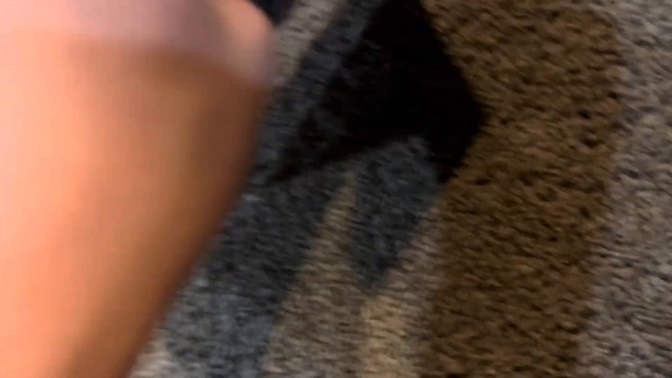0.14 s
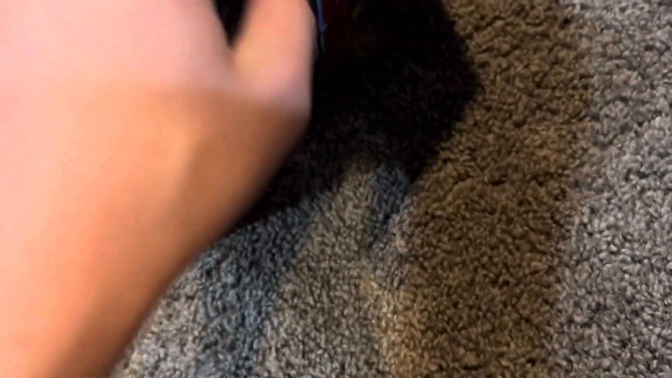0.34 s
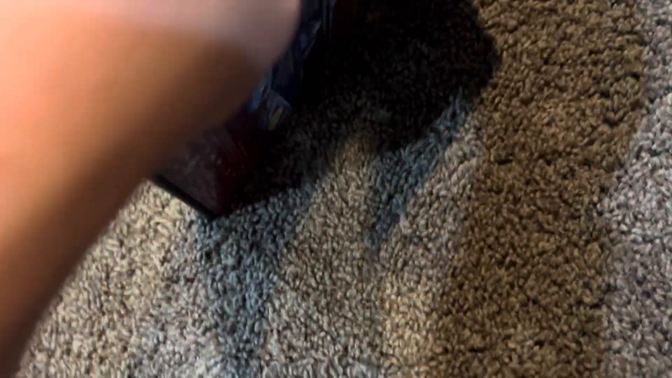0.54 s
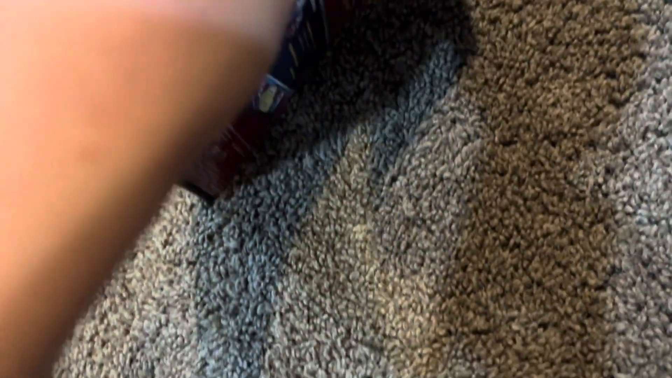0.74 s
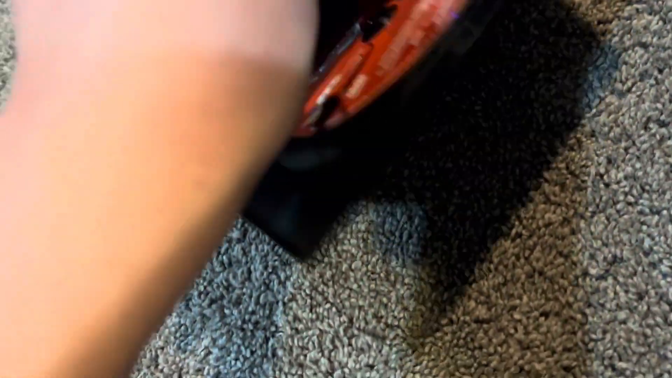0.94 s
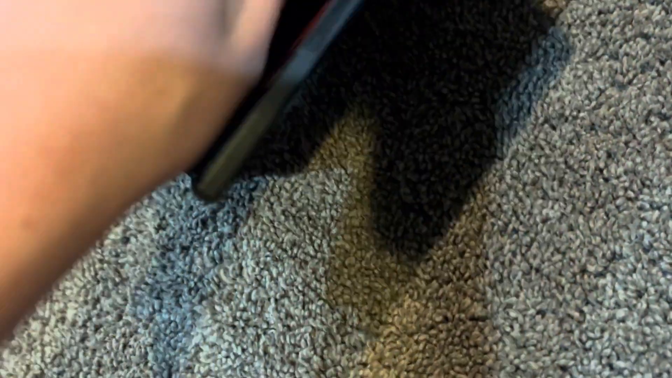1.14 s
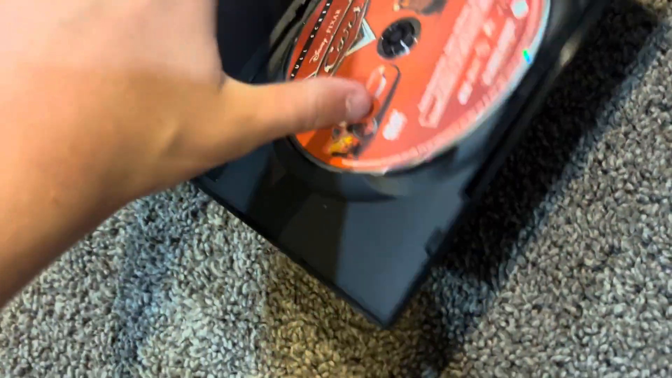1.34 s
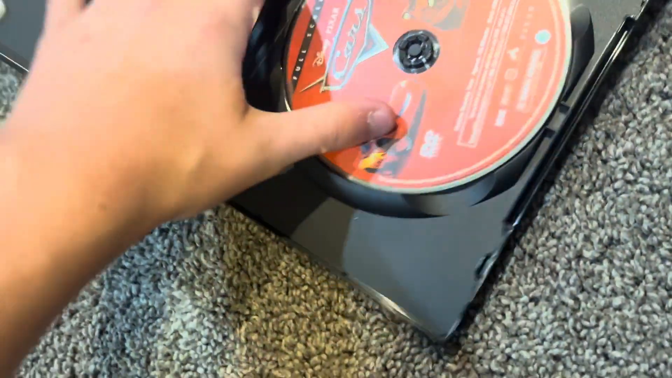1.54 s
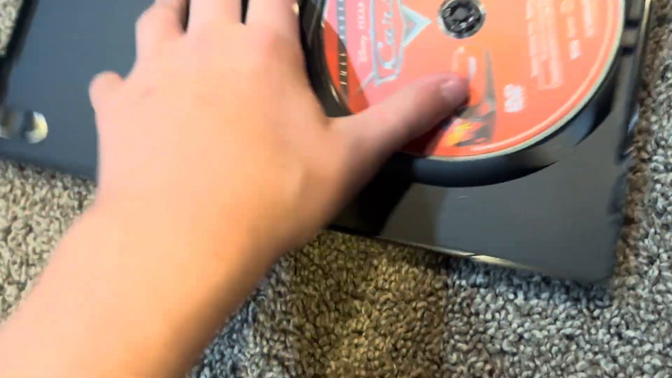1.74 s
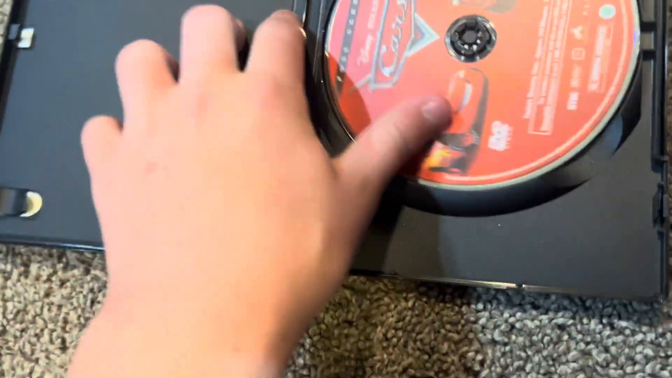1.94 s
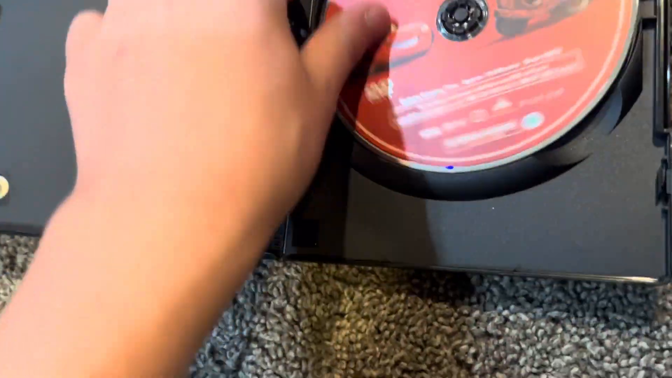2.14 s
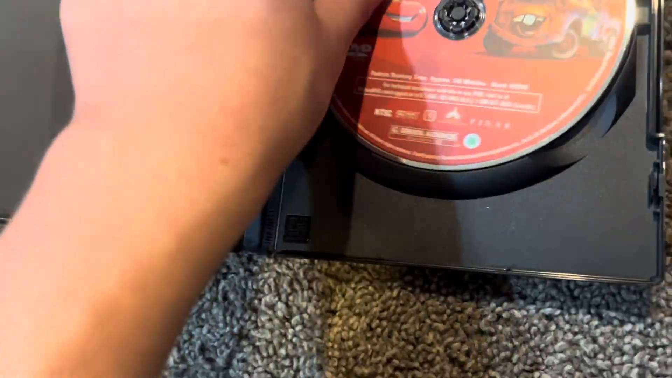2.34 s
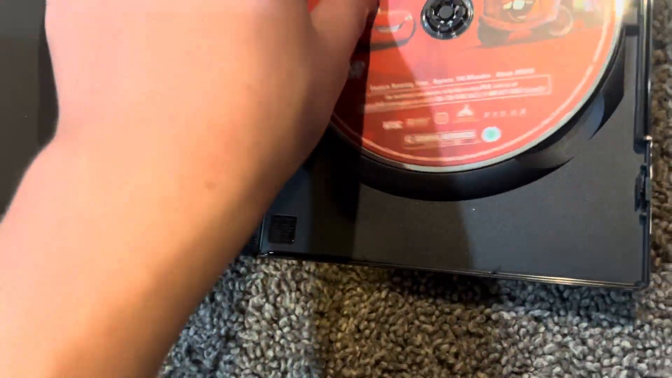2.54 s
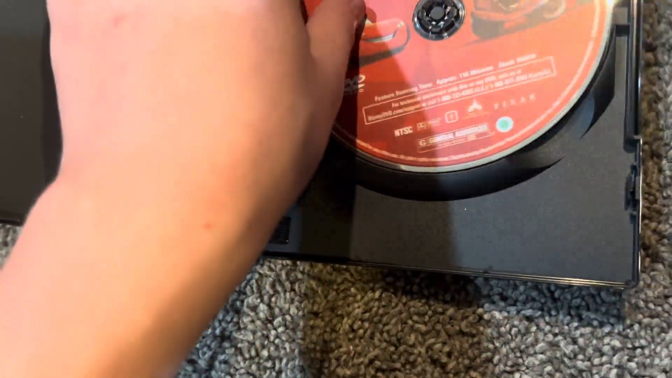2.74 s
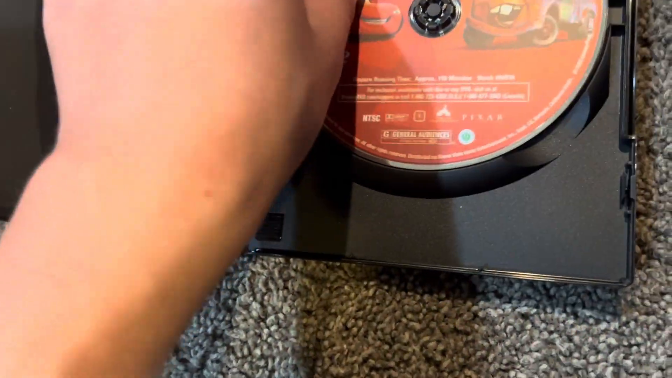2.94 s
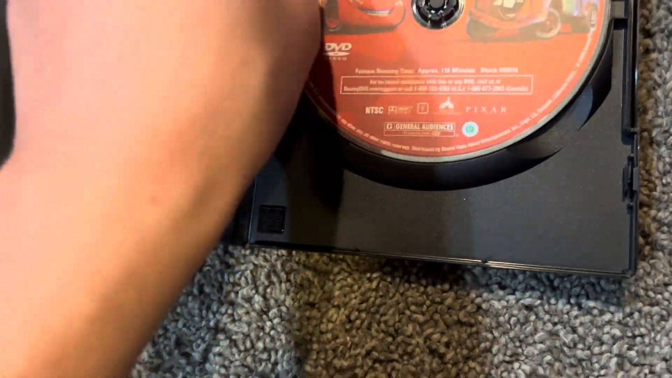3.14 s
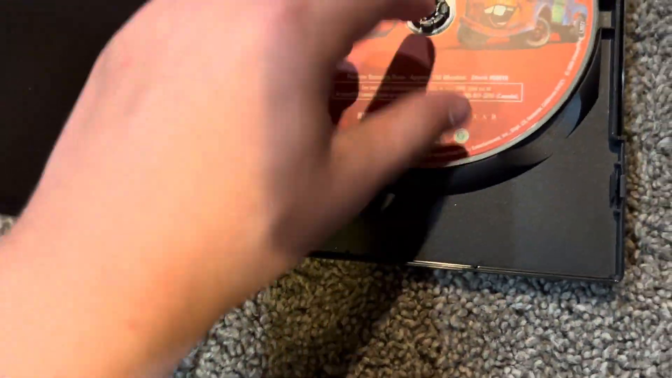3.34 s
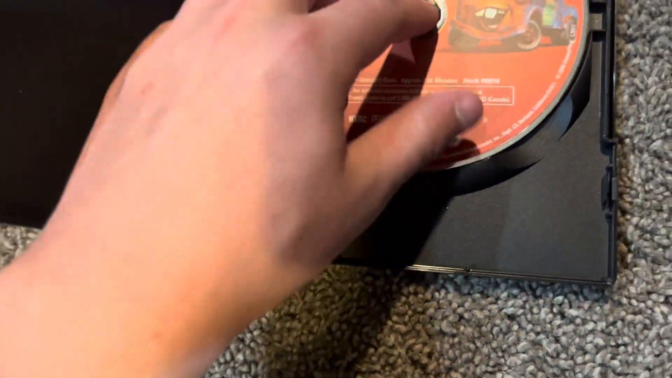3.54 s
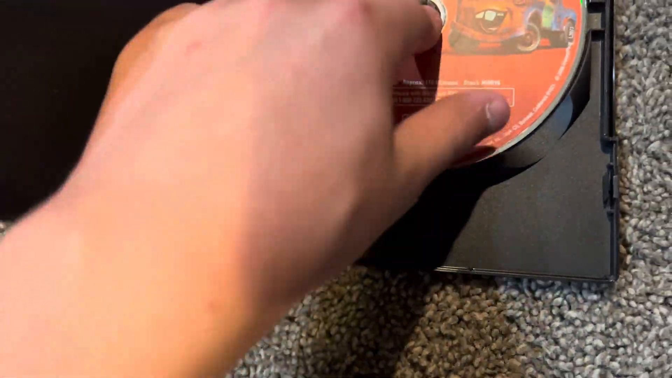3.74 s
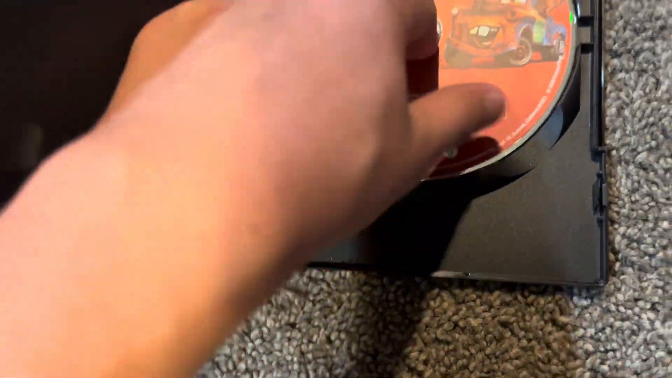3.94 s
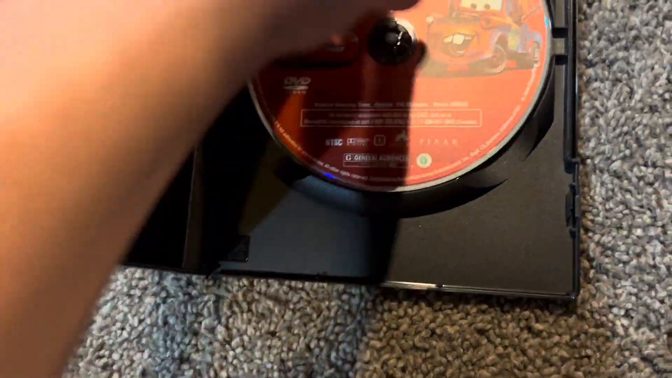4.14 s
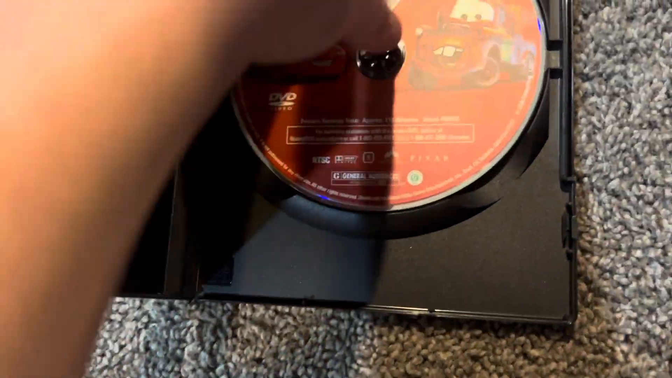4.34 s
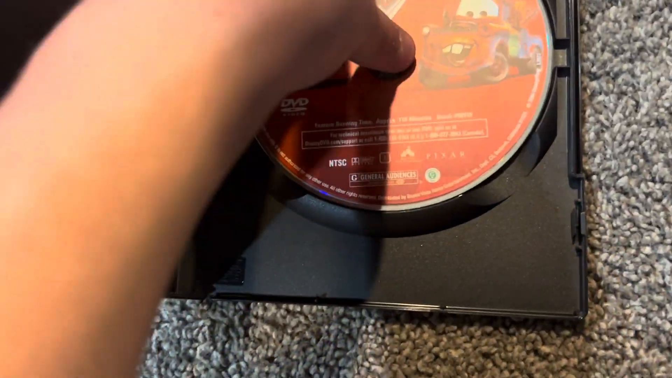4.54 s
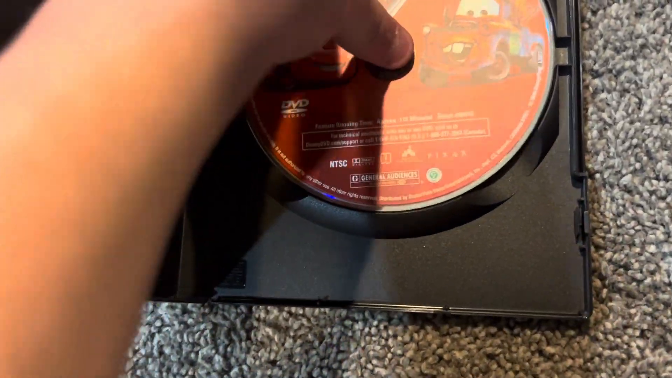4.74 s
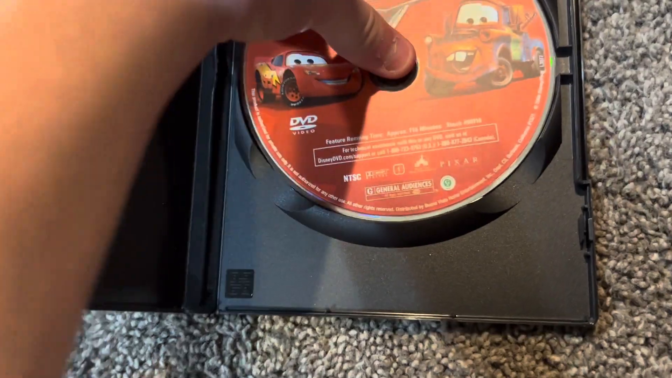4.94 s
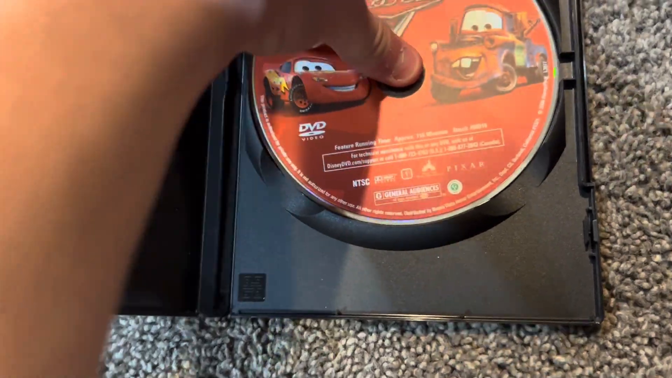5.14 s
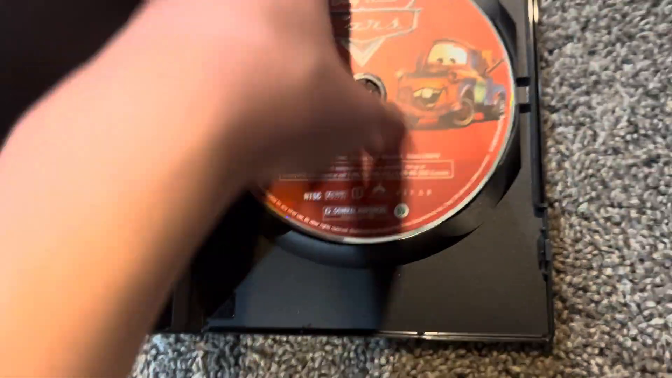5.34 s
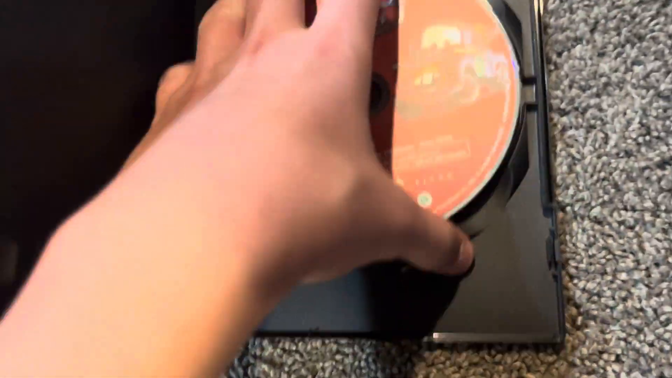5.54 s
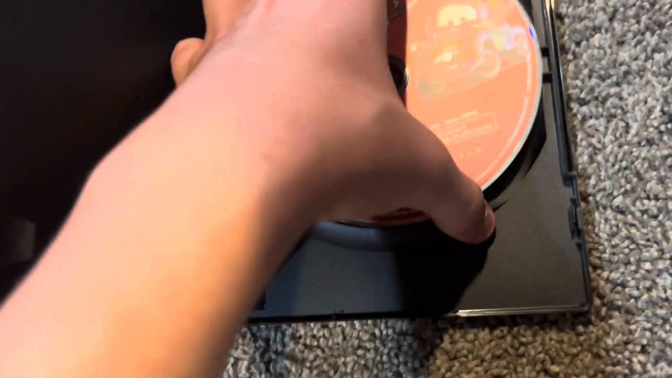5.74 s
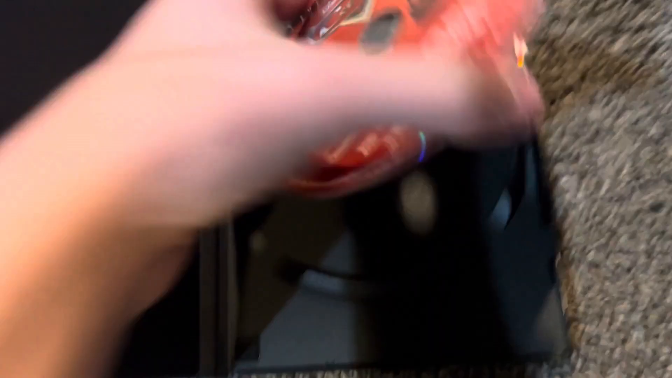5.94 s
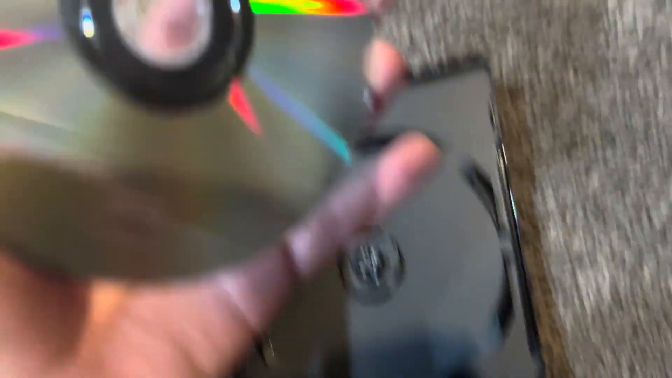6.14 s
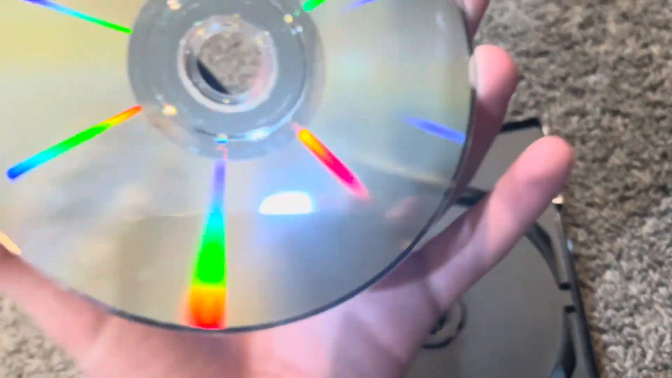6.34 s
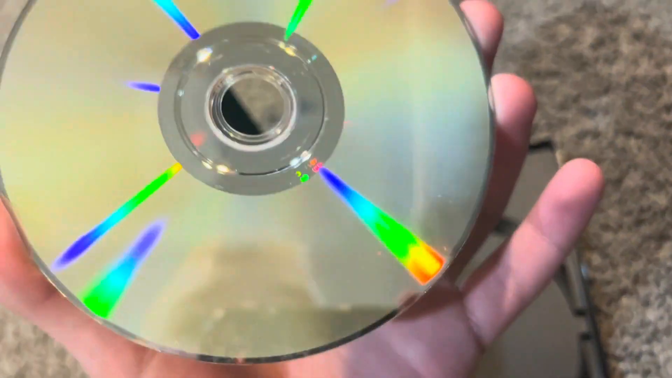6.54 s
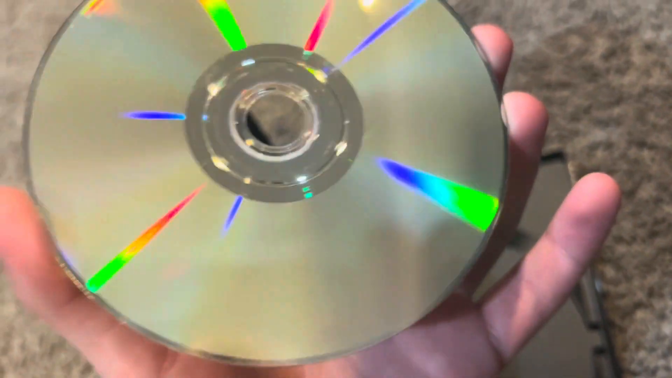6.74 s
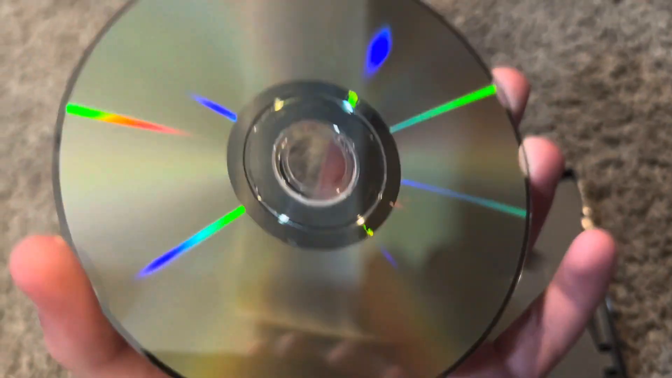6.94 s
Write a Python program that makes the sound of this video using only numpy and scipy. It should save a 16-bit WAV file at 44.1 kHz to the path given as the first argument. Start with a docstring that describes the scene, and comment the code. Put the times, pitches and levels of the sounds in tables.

```python
"""Plastic disc case handled on a carpet

Two latches snap open as ringing modes with a crack and a thump; the spine crackles in filtered noise bursts.
Fingers slide over case and disc as coloured noise, with squeaks and groans from noise-fed resonances.
The hub lets go with two snaps, and the loose disc rattles and knocks against the tray.
All is close to the microphone, with a short room tail, over a low hum with wavering tones and faint hiss."""
import sys
import numpy as np
from scipy import signal
from scipy.fft import rfft, irfft, next_fast_len
from scipy.io import wavfile

SR = 44100
rng = np.random.default_rng(int(sys.argv[2]) if len(sys.argv) > 2 else 0)


def log_audio(samples):
    """Write samples as a 16-bit WAV file to the path given in sys.argv[1]."""
    # one column per channel
    frames = np.atleast_2d(samples).T
    # limit to full scale, then quantise
    limited = np.clip(frames, -1, 1)
    pcm = np.round(limited * 32767).astype(np.int16)
    wavfile.write(sys.argv[1], SR, pcm)


N = 308259
TIME_S = np.arange(N) / SR
HIT_TIME_S = np.arange(6000) / SR


def gain_of(db):
    """Decibels to amplitude."""
    return 10 ** (np.asarray(db) / 20)


def evened(x):
    """Scales to an rms of one."""
    return x / np.sqrt(np.mean(x ** 2) + 1e-20)


def sized(x, db):
    """Gives a hit the energy of a hundredth of a second at this level."""
    return gain_of(db) * x / np.sqrt(np.sum(x ** 2) / (SR / 100) + 1e-20)


def read(points, hz):
    """Interpolates a table along a logarithmic frequency axis."""
    table_hz, value = np.transpose(points)
    return np.interp(np.log(hz + 1), np.log(table_hz + 1), value)


def add(mix, start_s, sound):
    """Mixes a sound in at a time."""
    part = mix[round(start_s * SR):][:len(sound)]
    part += sound[:len(part)]


def colour(x, spectrum, size=2048):
    """Causal minimum-phase filter with the given spectrum."""
    hz = abs(np.fft.fftfreq(size, 1 / SR))
    log_gain = np.log(gain_of(read(spectrum, hz)))
    response = np.exp(np.conj(signal.hilbert(log_gain)))
    taps = np.fft.ifft(response).real
    return signal.oaconvolve(x, taps[:size // 2])[:len(x)]


def drift(rate_hz):
    """Slow random wander of rms one."""
    hz = np.fft.rfftfreq(N, 1 / SR)[:N // 200]
    noise = rng.standard_normal(2 * len(hz) - 2)
    slow = irfft(rfft(noise) / (1 + (hz / rate_hz) ** 2))
    return evened(np.interp(TIME_S, np.linspace(0, TIME_S[-1], len(slow)), slow))


def burst(decay_s):
    """A chattering contact: noise that dies away exponentially."""
    return rng.standard_normal(len(HIT_TIME_S)) * np.exp(-HIT_TIME_S / decay_s)


def tone(hz, decay_s):
    """One dying mode."""
    return np.sin(2 * np.pi * hz * HIT_TIME_S) * np.exp(-HIT_TIME_S / decay_s)


def ring(modes):
    """The answer of a set of modes to one blow."""
    return sum(gain_of(db - 60 * HIT_TIME_S / t60_s) * np.sin(2 * np.pi * hz * HIT_TIME_S)
               for hz, db, t60_s in modes)


# Spectrum of cracking plastic. Each row: frequency in Hz, relative density in dB.
CRACK_SPECTRUM = [(200, -17.5), (600, -6.5), (1500, 0), (3000, -2.5), (4200, -3.5), (8500, -6.5),
                  (12500, -5.5), (14500, -11), (16000, -32)]


def snaps(rows, modes, crack_s, thump_hz, thump_s, rise_s):
    """A catch gives way: the plastic cracks and rings, and the tray recoils."""
    out = np.zeros(N)
    for start_s, ring_db, crack_db, thump_db in rows:
        body = sized(ring(modes) * (1 - np.exp(-HIT_TIME_S / rise_s)), ring_db)
        crack = sized(colour(burst(crack_s), CRACK_SPECTRUM), crack_db)
        thump = sized(tone(thump_hz, thump_s), thump_db)
        add(out, start_s, body + crack + thump)
    return out


# Lid latches letting go. Each row: start in seconds, ring in dB, crack in dB, thump in dB.
LATCHES = [(.8915, -14, -25, -33), (.90185, -11.5, -22, -20.5)]
# Modes of the closed shell. Each row: frequency in Hz, relative level in dB, t60 in seconds.
SHELL_MODES = [(235, -13, .04), (420, -10.5, .03), (492, -6, 0.032), (770, -6, .025), (863, 2.5, 0.023),
               (1027, -2.5, 0.023), (1524, 3, 0.015), (2000, -2, 0.014), (2650, -10.5, .025),
               (3100, -6.5, 0.013), (5560, -15.5, .02)]


def lid_latches():
    """Each latch releases and sets the closed shell ringing."""
    return snaps(LATCHES, SHELL_MODES, crack_s=.004, thump_hz=122, thump_s=0.0061, rise_s=0.0013)


# Hub prongs letting go of the disc. Each row: start in seconds, ring in dB, crack in dB, thump in dB.
HUB_PRONGS = [(5.0432, -20, -20, -38), (5.0451, -19.5, -19.5, -36)]
# Modes of the disc in its tray. Each row: frequency in Hz, relative level in dB, t60 in seconds.
DISC_MODES = [(570, -13.5, 0.023), (1000, -9.5, 0.014), (1557, -0.5, 0.028), (1634, -8.5, 0.022),
              (2120, -6, 0.024), (2672, -12.5, 0.013), (3070, 1, 0.015), (3980, -16, 0.012),
              (4700, -15.5, .02), (5360, -12.5, .015), (6180, -5.5, 0.012), (7300, -7.5, 0.0064),
              (8180, -9, 0.027)]


def hub_prongs():
    """Each prong releases and sets the disc ringing in its tray."""
    return snaps(HUB_PRONGS, DISC_MODES, crack_s=0.0017, thump_hz=205, thump_s=0.0055, rise_s=0.00093)


# Modes of the freed disc. Each row: frequency in Hz, relative level in dB, t60 in seconds.
FREE_DISC_MODES = [(1590, -0.5, .04), (2200, -1.5, 0.025), (3010, -8, .025)]


def free_disc(rattle_db=-38):
    """No longer held by the hub, the disc rattles against it and settles."""
    out = np.zeros(N)
    rattle = signal.fftconvolve(burst(decay_s=.03), ring(FREE_DISC_MODES))
    add(out, HUB_PRONGS[-1][0], sized(rattle, rattle_db))
    return out


# Parts of a click: thud of tray, knock of shell, ring of disc, edge tick.
# Each row: low edge in Hz, high edge in Hz, contact decay in seconds before the length share.
CLICK_PARTS = [(138, 490, 0.0039), (520, 1100, .0016), (1900, 4200, 0.0033), (4500, 16000, .0016)]
# Share of the brightness for those four parts: a harder contact gives less thud, more edge.
CLICK_TILT = (-.8, 0, 0.67, 1)


def clicks(rows, mix_db, level_db, tone_db, ring_share, length_share):
    """Each small contact shakes tray, shell, disc and edge; a harder one leans to the treble."""
    out = np.zeros(N)
    body = ring_share * ring(DISC_MODES)
    body[0] += 1  # the direct contact
    for (low_hz, high_hz, decay_s), part_db, tilt in zip(CLICK_PARTS, mix_db, CLICK_TILT):
        band = signal.butter(2, [low_hz, high_hz], "band", fs=SR, output="sos")
        answer = signal.sosfilt(band, body)
        for start_s, db, bright_db, _ in rows:
            hit = signal.fftconvolve(burst(length_share * decay_s), answer)[:len(HIT_TIME_S)]
            add(out, start_s, sized(hit, level_db + db + part_db + tilt * bright_db))
    # the spot that is struck favours one mode
    for start_s, db, _, hz in rows:
        add(out, start_s, sized(tone(hz, decay_s=.0035), tone_db + db))
    return out


# Contacts, levels before the mix. Each row: start in seconds, level in dB, brightness in dB,
# main resonance in Hz (none for creaks).
CRACKLES = [(.2421, -54, 1, 1590), (.2642, -45.5, -2, 1600), (.298, -49, -10, 784), (.9213, -36, 3, 983),
            (.934, -45, 3, 3210), (.951, -54.5, 7, 979), (.969, -45, 1, 980), (.995, -52.5, 7.5, 1260),
            (1.0152, -42.5, 0, 2740), (1.052, -55.5, 5, 4160), (1.0734, -52, -5.5, 3400),
            (1.126, -41.5, -1, 1580), (1.1545, -50.5, 2.5, 3350), (1.17, -54.5, 3, 4150),
            (1.199, -55, 4, 2900), (1.2132, -41.5, 1.5, 2440), (4.0434, -48.5, 4, 3262),
            (4.9514, -62, 6, 3220), (5.2456, -52.5, -6.5, 2820)]  # spine and stiff plastic
TAPS = [(.017, -54, -2, 800), (.0923, -55, -1, 1840), (.111, -53, -2, 1460), (1.694, -57, -22.5, 1010),
        (1.837, -49, -15, 636), (2.1692, -43.5, 1.5, 1085), (2.271, -48, 6, 1120), (2.3473, -49, 1.5, 853),
        (4.2817, -53, -1, 910)]  # fingertips on the hollow shell
CREAKS = [(2.6222, -44, 1), (2.6752, -57.5, -4), (4.2817, -58, -14), (4.4764, -43.5, 3.5),
          (4.501, -42.5, 3.5), (4.5237, -43.5, 2), (4.54, -47.5, -3), (4.55, -52.5, -14), (4.59, -57.5, 13),
          (4.6421, -54.5, -9), (4.7021, -36.5, 10.5), (4.7307, -52, 7), (5.2894, -56, -1), (5.299, -50, 10),
          (5.32, -61, 3.5), (5.6222, -59, 7)]  # disc bent on the hub
KNOCKS = [(1.127, -37.5, 0.5, 885), (4.71, -38.5, -5, 560), (5.0555, -43, 2, 1662),
          (5.278, -50, -10.5, 2780), (5.3399, -59, 15, 995), (5.348, -54.5, -10.5, 980),
          (5.529, -42, 1, 659), (5.5382, -38, -4.5, 670), (5.574, -46, -7, 604), (5.584, -45, -1, 670),
          (5.6539, -36.5, -3.5, 760), (5.665, -57.5, -6, 720), (5.7582, -49, -7, 920),
          (5.7693, -49, 7.5, 3150), (5.7973, -33, -4, 1030), (5.804, -45.5, -12, 830),
          (5.8445, -59, -7.5, 913), (5.8639, -39, 3, 745), (5.884, -52.5, 9, 935), (5.891, -41.5, 5, 900)]  # disc and lid against the tray
# Mix in dB of thud, knock, ring and edge tick.
CRACKLE_MIX, TAP_MIX, CREAK_MIX, KNOCK_MIX = (-5, -5, -1, 0), (-11.5, 0, -17.5, -22), (-5.5, -8, -5, -20), (-2.5, 0, -6, -15.5)
# Each creak's main resonance is scattered at random around one pitch.
CREAK_HZ, CREAK_SCATTER = 2504, 0.057


def contacts():
    """Crackles of the spine, taps on the shell, creaks of the disc and knocks on the tray."""
    creaks = [(*row, CREAK_HZ * (1 + CREAK_SCATTER * rng.uniform(-0.9, 1))) for row in CREAKS]
    return (clicks(CRACKLES, CRACKLE_MIX, level_db=-3, tone_db=-4, ring_share=.03, length_share=1.0)
            + clicks(TAPS, TAP_MIX, level_db=-3, tone_db=-3, ring_share=0.047, length_share=2.0)
            + clicks(creaks, CREAK_MIX, level_db=-4.0, tone_db=-3, ring_share=0.036, length_share=0.79)
            + clicks(KNOCKS, KNOCK_MIX, level_db=0, tone_db=-2.5, ring_share=0.039, length_share=1.4))


# A longer stroke lifts more slowly.
PRESS_SHARE, LIFT_S, LIFT_SHARE = 0.4, 0.0037, 0.054


def pressure(length_s):
    """One stroke: pressure builds, holds and dies away."""
    lift_s = LIFT_S + LIFT_SHARE * length_s
    t = np.arange(0, length_s + 10 * lift_s, 1 / SR)
    press = np.minimum(t / (PRESS_SHARE * length_s), 1)
    return press * np.exp(-np.maximum(t - length_s, 0) / lift_s)


# Strokes, levels before mix and wander. Each row: start in seconds, length in seconds, level in dB,
# brightness in dB.
RUBS = [(.003, 0.047, -65, 14), (.236, 0.06, -47.5, 3.5), (.257, 0.0088, -47.5, 3), (.298, 0.055, -63.5, 3),
        (.48, 0.033, -67, 4), (.55, 0.041, -68, 0), (.735, 0.078, -71, 5.5), (.872, 0.046, -46.5, -2),
        (.91, 0.13, -52, 2.5), (1.08, .07, -55, 6.5), (1.31, 0.22, -58, -3), (1.46, 0.17, -55.5, -4),
        (1.57, 0.33, -61.5, 10), (1.8, 0.13, -53, 4.5), (1.87, 0.21, -53, -6), (2.345, 0.052, -53, 5),
        (2.475, 0.076, -59.5, -9.5), (2.57, 0.13, -64.5, -14.5), (2.675, 0.065, -52.5, -11.5),
        (3.5, 0.16, -68, 3.5), (4.425, 0.19, -62.5, 3), (4.78, .12, -58.5, 5), (5.26, 0.057, -55.5, 7.5),
        (5.34, 0.071, -70.5, -10), (5.515, 0.16, -60, 2), (5.75, .17, -60.5, 2)]  # finger or palm on the hollow case
SCRAPES = [(1.14, 0.11, -58, -13), (1.88, 0.11, -53, -5), (2.0, 0.067, -61.5, 11), (2.09, 0.1, -68, -0.5),
           (2.18, 0.12, -72.5, -7), (2.89, 0.012, -68.5, -12), (2.99, .022, -64, -1),
           (3.035, .03, -71.5, -6.5), (3.425, 0.051, -70, 2), (3.45, .22, -76.5, 2.5),
           (3.63, 0.25, -74, 5.5), (4.02, 0.058, -65.5, -5), (4.27, 0.049, -68.5, -1.5),
           (4.62, 0.17, -59.5, -13), (4.87, .09, -65, -6.5), (4.95, 0.16, -71.5, 4.5),
           (5.05, .14, -61.5, -2.5), (5.16, 0.19, -62.5, -3), (5.66, 0.12, -64.5, -1)]  # fingertip over the disc
BRUSHES = [(1.265, 0.067, -57.5, 3.5), (1.31, 0.18, -66.5, 12), (1.45, 0.15, -69, 8.5),
           (2.01, 0.072, -59, 12.5), (3.15, 0.036, -68, 1), (3.9, .13, -64, -3.5),
           (4.33, 0.072, -72.5, -5.5), (4.435, .035, -50.5, -9.5), (5.46, 0.062, -61.5, -5),
           (5.91, 0.1, -71, 0.5), (6.0, 0.1, -59, 0), (6.08, 0.13, -67.5, 2), (6.17, .12, -77, 0),
           (6.38, 0.12, -85.5, 1)]  # cover over the carpet, or disc against the hand
# Mix in dB of skin on the case, scrape of the disc, fine hiss.
RUB_MIX, SCRAPE_MIX, BRUSH_MIX = (0, -14, -14), (-2, 0, -3), (-5, -12.5, 0)
# Share of a stroke's brightness that goes to skin, scrape and hiss.
STROKE_TILT = (0, .5, 1)
# The pressure of a hand is never even.
WANDER_DB, WANDER_HZ = 3.4, 9


def strokes():
    """How strongly all strokes stir skin, scrape and hiss: powers add, then the level wanders."""
    power = np.zeros((3, N))
    for rows, mix_db in [(RUBS, RUB_MIX), (SCRAPES, SCRAPE_MIX), (BRUSHES, BRUSH_MIX)]:
        for start_s, length_s, db, bright_db in rows:
            for layer, layer_db, tilt in zip(power, mix_db, STROKE_TILT):
                level = gain_of(db + layer_db + tilt * bright_db)
                add(layer, start_s, (level * pressure(length_s)) ** 2)
    return np.sqrt(power) * gain_of(WANDER_DB * drift(rate_hz=WANDER_HZ))


def friction(spectrum, slips_per_s, spread_db, smooth_share, judder_db):
    """Tiny slips of uneven size over a smooth hiss; the contact judders as it slides."""
    sizes = gain_of(spread_db * np.minimum(rng.exponential(1, N), 4))
    happens = rng.random(N) < slips_per_s / SR
    slips = sizes * rng.choice([-1, 1], N) * happens
    judder = gain_of(judder_db * drift(rate_hz=22))
    drive = (evened(slips) + smooth_share * rng.standard_normal(N)) * judder
    return evened(colour(drive, spectrum))


# Friction spectra. Each row: frequency in Hz, relative density in dB.
SKIN_SPECTRUM = [(150, -26), (350, -7), (600, 0), (950, 1.5), (1300, -4.5), (1650, -5), (2300, -19.5),
                 (4000, -24), (9000, -46.5)]
SCRAPE_SPECTRUM = [(1200, -26), (2000, -10.5), (2450, 4.5), (2850, -8), (3170, 3.5), (3500, -12.5),
                   (3800, -7), (4150, -10), (4650, -11.5), (5350, -10.5), (6000, -8.5), (7500, -18.5),
                   (12000, -26.5)]
HISS_SPECTRUM = [(800, -17), (2500, -6.5), (4200, -1), (7000, -3.5), (9000, -0.5), (10500, 3.5),
                 (12200, -1), (14000, -8.5), (15200, -13), (16000, -32)]


def rubbing():
    """Skin on the hollow case, fingers on the disc, the cover brushing the carpet."""
    skin, scrape, hiss = strokes()
    skin_noise = friction(SKIN_SPECTRUM, slips_per_s=1400, spread_db=3.5, smooth_share=0.94, judder_db=1.5)
    scrape_noise = friction(SCRAPE_SPECTRUM, slips_per_s=940, spread_db=1.5, smooth_share=.4, judder_db=-1.0)
    hiss_noise = friction(HISS_SPECTRUM, slips_per_s=4000, spread_db=2.0, smooth_share=0.87, judder_db=1.64)
    return skin * skin_noise + scrape * scrape_noise + hiss * hiss_noise


def sing(length_s, hz, width_hz, db):
    """Irregular sticking and slipping feeds one resonance for the length of a stroke."""
    # applied twice, for steep sides
    b, a = signal.iirpeak(hz, hz / width_hz * np.sqrt(np.sqrt(2) - 1), fs=SR)
    once = signal.lfilter(b, a, rng.standard_normal(SR // 2))
    sung = signal.lfilter(b, a, once)[:round(length_s * SR)]
    return gain_of(db) * evened(sung * signal.windows.tukey(len(sung), .3))


# Fingertip squeaks on the disc. Each row: start in seconds, length in seconds, level in dB before the
# mode levels, brightness in dB per octave.
SQUEAKS = [(1.886, 0.065, -45.5, -0.5), (1.996, 0.089, -43.5, -2), (2.068, 0.021, -37.5, 1),
           (3.435, 0.041, -68.5, 5)]
# Resonances in every squeak, lowest first. Each row: frequency in Hz, width in Hz, relative level in dB.
SQUEAK_MODES = [(2476, 360, -5), (3160, 98, -4), (3790, 90, -8), (4720, 440, -13), (5820, 60, -13),
                (6630, 710, -12)]
# Plastic groaning on one note as it is dragged or bent. Each row: start in seconds, length in seconds,
# frequency in Hz, width in Hz, level in dB.
GROANS = [(.257, 0.0243, 1607, 59, -43.5), (0.472, 0.16, 1600, 100, -78), (2.35, 0.063, 1760, 451, -60),
          (2.613, 0.065, 3150, 122, -67), (2.685, 0.055, 1780, 605, -64.5), (3.426, 0.055, 3180, 328, -63),
          (4.693, 0.047, 2630, 120, -50), (5.559, 0.032, 2910, 143, -53.5), (5.875, 0.034, 930, 70, -46.5),
          (6.014, .16, 3710, 382, -68), (6.021, 0.129, 1160, 151.7, -69.5),
          (6.014, 0.174, 2350, 348, -71.5)]


def squeaks():
    """A squeak sets a stack of resonances singing, a groan only one."""
    out = np.zeros(N)
    for start_s, length_s, db, bright_db in SQUEAKS:
        for hz, width_hz, mode_db in SQUEAK_MODES:
            octaves = np.log2(hz / SQUEAK_MODES[0][0])
            add(out, start_s, sing(length_s, hz, width_hz, db + mode_db + bright_db * octaves))
    for start_s, *groan in GROANS:
        add(out, start_s, sing(*groan))
    return out


# Case bumping on the carpet. Each row: start in seconds, frequency in Hz, level in dB, decay in seconds.
BUMPS = [(.897, 202, -27, .008), (0.901, 490, -29, .012), (0.901, 59.4, -28.5, .03),
         (0.918, 135, -31, .012), (1.042, 44.6, -43, .08), (1.215, 215.3, -35, .009),
         (4.701, 182.5, -28, .012), (4.7021, 603, -36, .007), (4.835, 119, -35.5, .012),
         (5.052, 220, -25.5, .005)]


def bumps(soft_s=0.0016):
    """Carpet or skin cushions each bump to one soft note."""
    out = np.zeros(N)
    for start_s, hz, db, decay_s in BUMPS:
        note = tone(hz, decay_s) * (1 - np.exp(-HIT_TIME_S / soft_s))
        add(out, start_s, sized(note, db))
    return out


def reflections(x, count=8, span_s=0.0019):
    """Hand and arm throw the sound back from the side within two milliseconds."""
    taps = np.zeros(SR // 20)
    delays = (span_s * SR * rng.random(count)).astype(int)
    taps[delays] = rng.choice([-1, 1], count)
    # long waves bend round the hand
    treble = signal.sosfilt(signal.butter(1, 350, "high", fs=SR, output="sos"), x)
    return signal.oaconvolve(treble, taps / np.sqrt(count))[:N]


# Room decay. Each row: frequency in Hz, t60 in seconds.
ROOM_DECAY = [(150, .3), (600, 0.18), (1600, 0.13), (4000, 0.12), (8000, 0.14), (15000, .2)]


def room(x, gap_s=0.0053):
    """Diffuse tails for the common and side signals, every band dying at its own speed."""
    t = np.arange(SR // 2) / SR
    hz, frame_s, bands = signal.stft(rng.standard_normal((2, len(t))), SR, nperseg=256)
    decay = gain_of(-60 * frame_s / read(ROOM_DECAY, hz)[:, None])
    tail = signal.istft(bands * decay, SR, nperseg=256)[1][:, :len(t)]
    tail = tail * np.clip(t / gap_s - 1, 0, 1)  # silent for one gap, full after two
    return signal.fftconvolve(x[None], tail / np.linalg.norm(tail[0]), axes=1)[:, :N]


# Spectra of rumble and air. Each row: frequency in Hz, relative density in dB.
RUMBLE_SPECTRUM = [(20, -34.5), (38, -7), (55, -4), (72, 2), (100, -0.5), (130, -3.5), (175, -2.5),
                   (215, -20), (270, -24), (350, -48)]
AIR_SPECTRUM = [(100, -7), (300, 6.5), (450, 1.5), (800, -7), (1000, -4), (1700, -7.5), (2200, -17),
                (4000, -23), (8000, -26), (15000, -27.5)]
# Hum tones. Each row: centre frequency in Hz, rms level in dB before a 2.5 dB cut.
HUM_TONES = [(70.0, -46.5), (118.4, -50)]


def hum(rumble_db=-45.0, air_db=-72, waver_db=1.0):
    """A low rumble with tones wavering in level and phase, under faint hiss."""
    rumble_shape = RUMBLE_SPECTRUM + [(700, -68.0), (2000, -100)]
    rumble = gain_of(rumble_db) * evened(colour(rng.standard_normal(N), rumble_shape, size=8192))
    out = rumble + gain_of(air_db) * evened(colour(rng.standard_normal(N), AIR_SPECTRUM))
    for hz, db in HUM_TONES:
        waver = gain_of(waver_db * drift(rate_hz=2))
        phase = 2 * np.pi * hz * TIME_S + .6 * drift(rate_hz=1.5)
        out += gain_of(db - 2.5) * evened(waver * np.sin(phase))
    return out


# Phase between the microphone ports. Each row: frequency in Hz, lead of the left in radians.
PORT_PHASE = [(100, 0), (700, .1), (1380, .5), (1900, .3), (3010, .8), (4400, .4), (5510, -.6), (7060, .1),
              (8100, -.6), (9220, -2.4), (10200, -3.3), (12400, -6.1), (13700, -6.5), (15200, -9.2)]
# Balance of the ports. Each row: frequency in Hz, left minus right in dB.
PORT_BALANCE = [(110, -1.5), (200, -4.5), (380, -0.5), (650, 1), (870, 0), (1290, 2), (2400, 1),
                (15000, -1)]


def ports(pair):
    """Two close ports hear nearly the same sound, with a phase and level difference."""
    size = next_fast_len(N + 4096)
    hz = np.fft.rfftfreq(size, 1 / SR)
    common, own = rfft(pair, size)
    lean = gain_of(read(PORT_BALANCE, hz) / 2) * np.exp(.5j * read(PORT_PHASE, hz))
    side = own / (1 + (hz / 7000) ** 4)
    return irfft(np.array([(common + side) * lean, (common - side) / lean]), size)[:, :N]


def scene():
    """Handling close by, its room tail, and the hum."""
    lid = lid_latches()
    hub = hub_prongs() + free_disc()
    small = contacts() + rubbing() + squeaks() + bumps()
    wet = room(gain_of(-22.5) * lid + gain_of(-16.5) * hub + gain_of(-16.5) * small)
    near = lid + hub + small
    side = gain_of(-10) * reflections(near) + gain_of(-17) * hum()
    return ports(wet + np.array([near + hum(), side]))


CUTOFF_HZ = 15200


def record(dry):
    """The lowest bass is cut, peaks are rounded off, then the band limit."""
    lean = signal.sosfilt(signal.butter(3, 34, "high", fs=SR, output="sos"), dry)
    rounded = 1.1 * np.tanh(lean / 1.1)
    lowpass = signal.firwin(255, CUTOFF_HZ, window=("kaiser", 9), fs=SR)
    return signal.oaconvolve(rounded, lowpass[None], "same")


dry = scene()
out = record(dry)
log_audio(out)
```